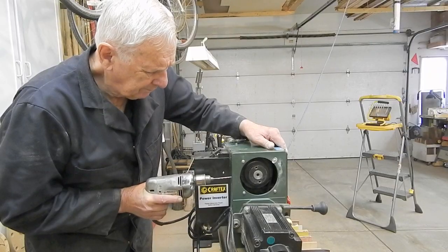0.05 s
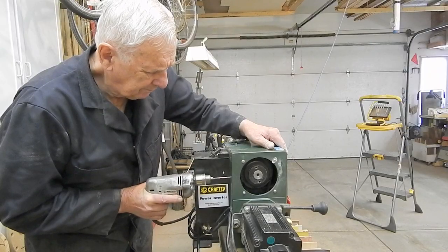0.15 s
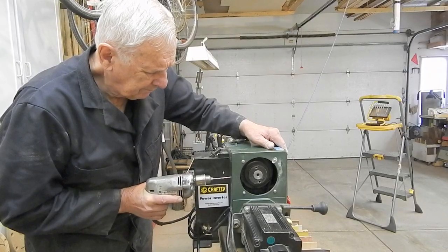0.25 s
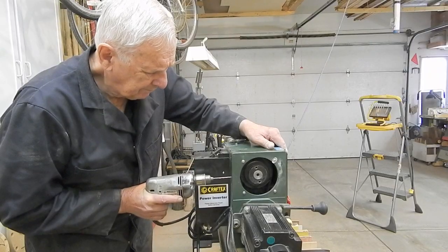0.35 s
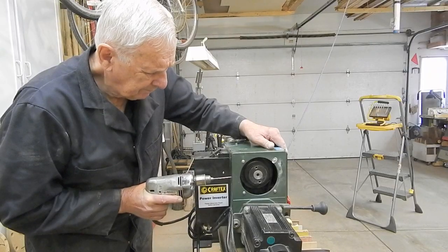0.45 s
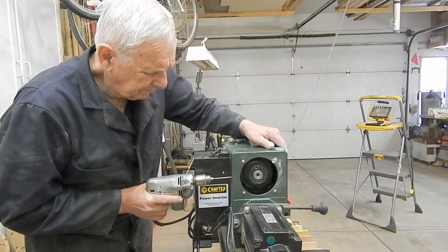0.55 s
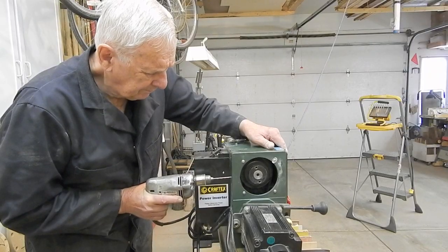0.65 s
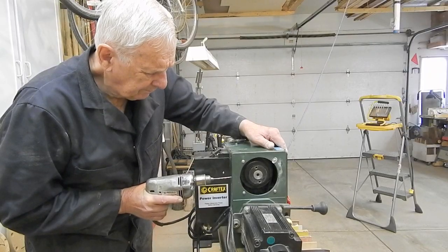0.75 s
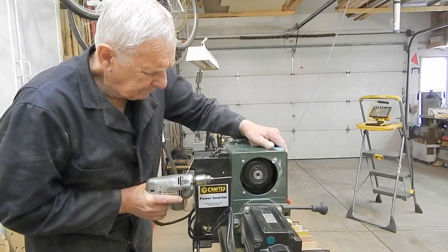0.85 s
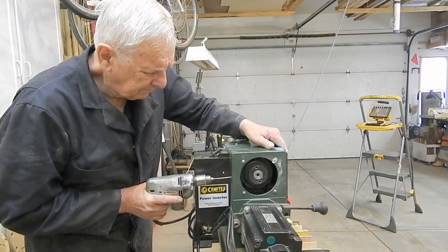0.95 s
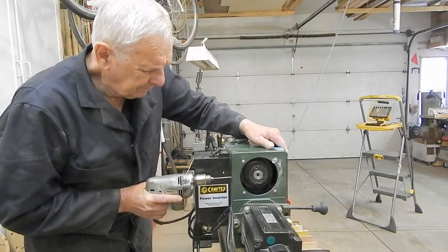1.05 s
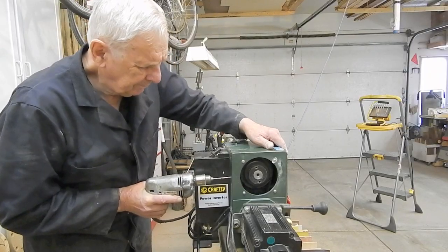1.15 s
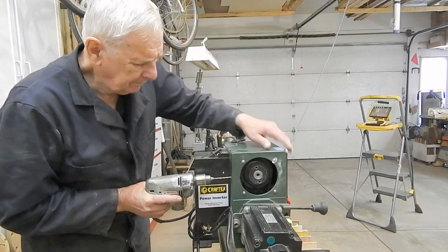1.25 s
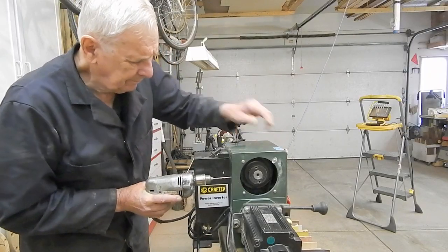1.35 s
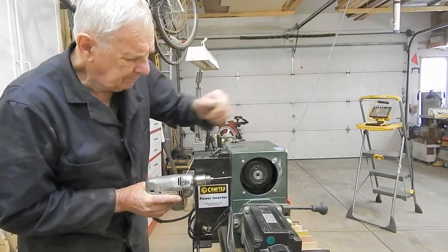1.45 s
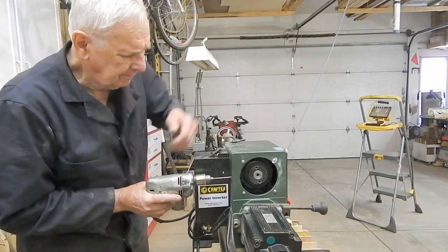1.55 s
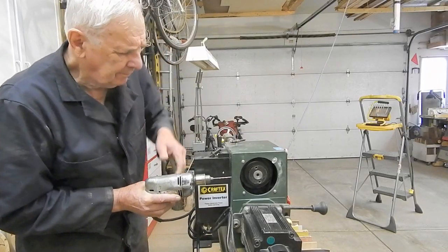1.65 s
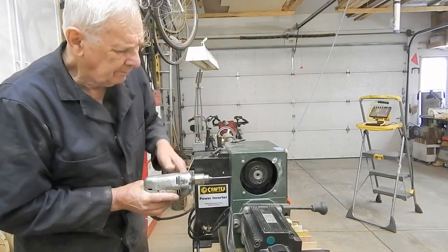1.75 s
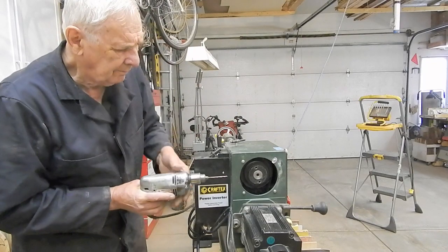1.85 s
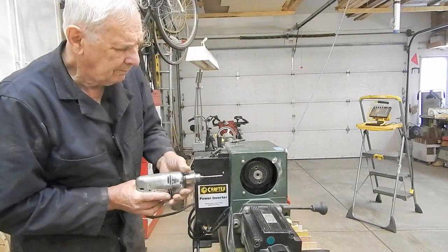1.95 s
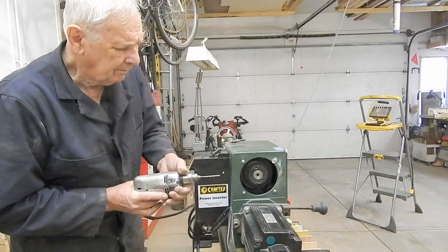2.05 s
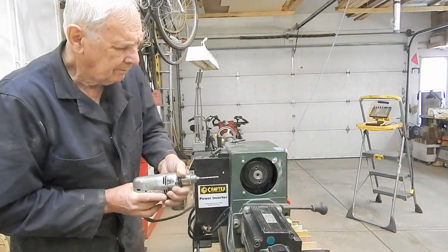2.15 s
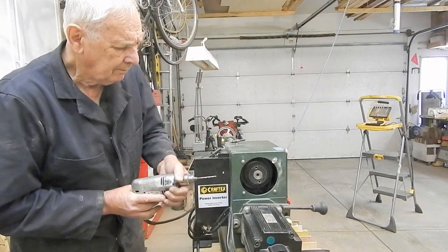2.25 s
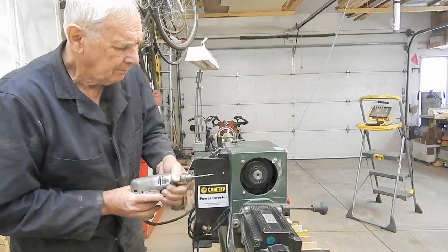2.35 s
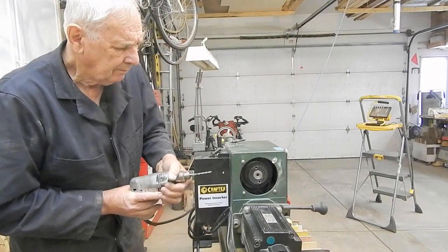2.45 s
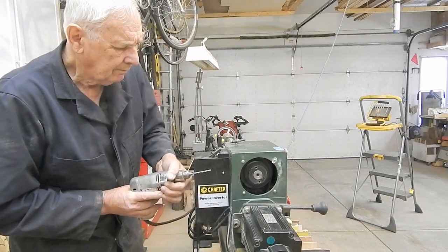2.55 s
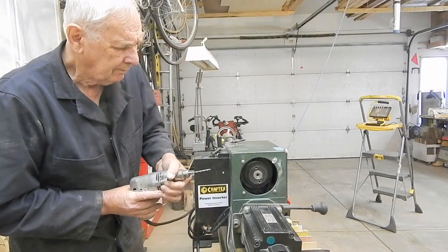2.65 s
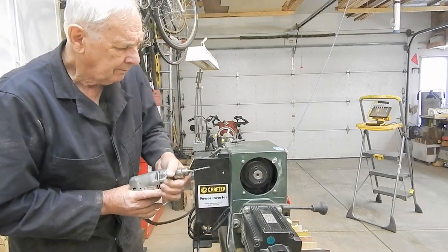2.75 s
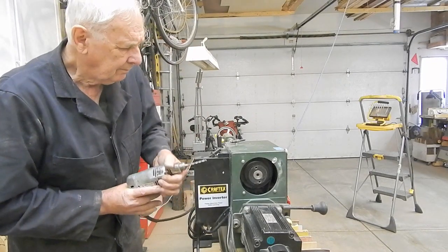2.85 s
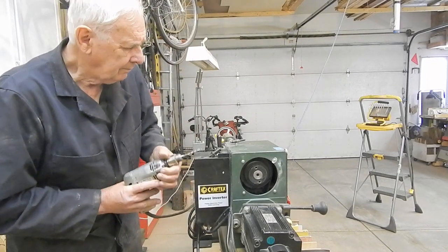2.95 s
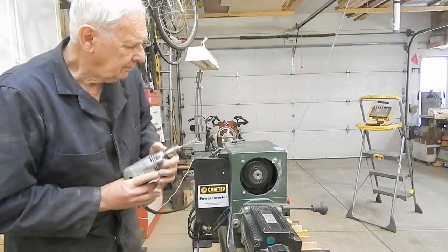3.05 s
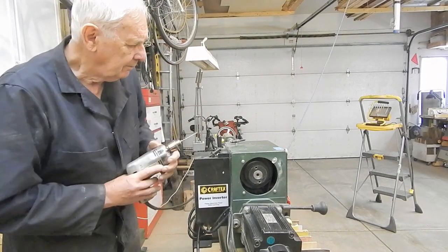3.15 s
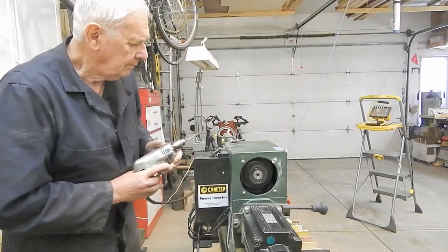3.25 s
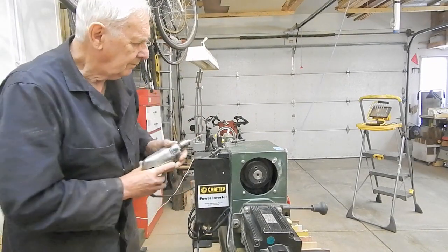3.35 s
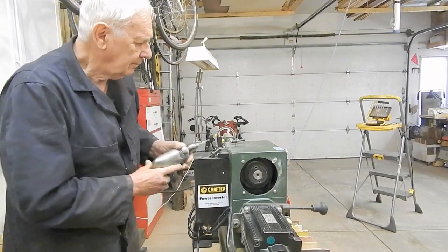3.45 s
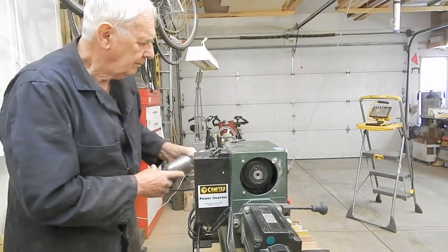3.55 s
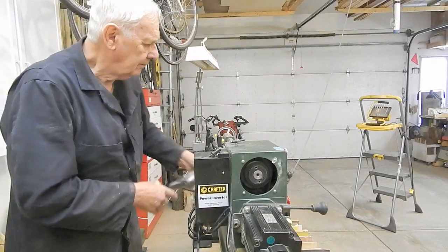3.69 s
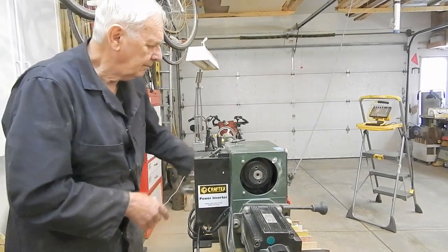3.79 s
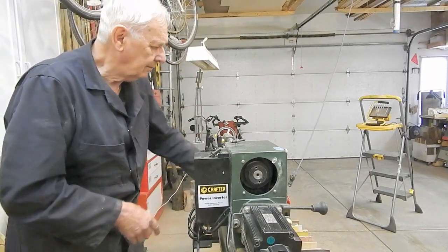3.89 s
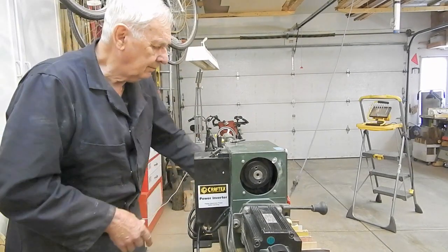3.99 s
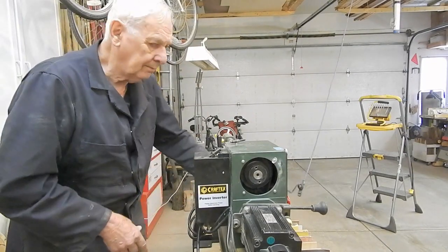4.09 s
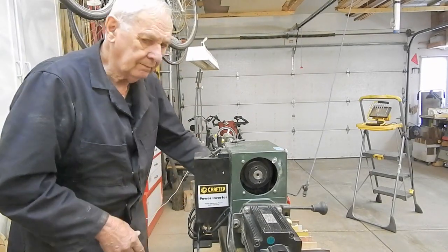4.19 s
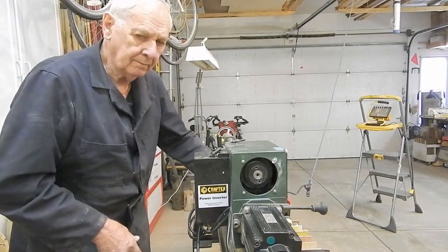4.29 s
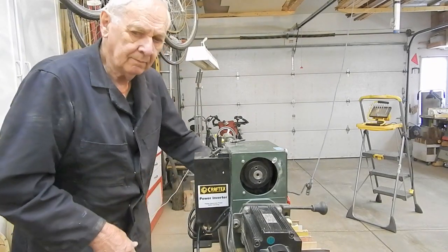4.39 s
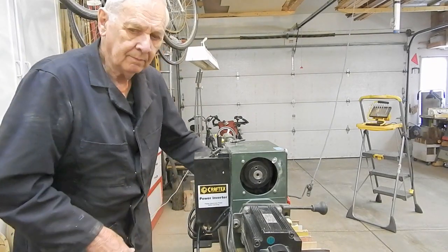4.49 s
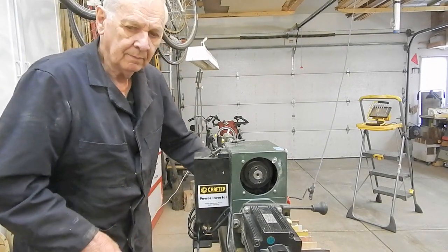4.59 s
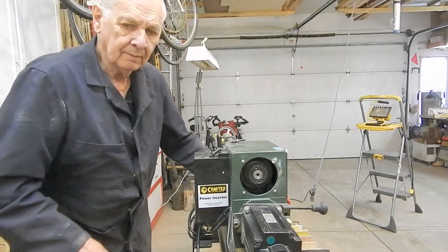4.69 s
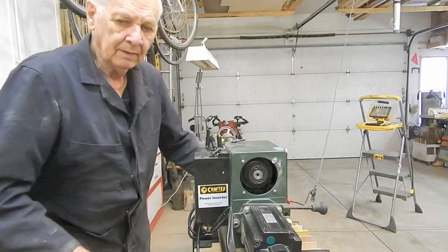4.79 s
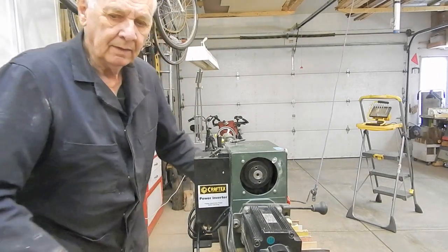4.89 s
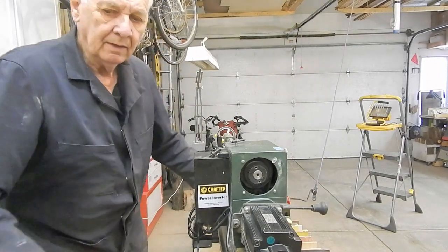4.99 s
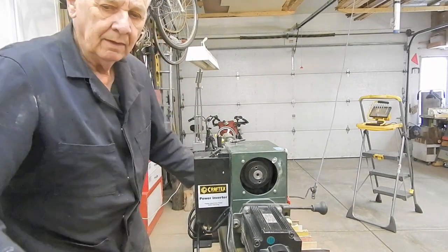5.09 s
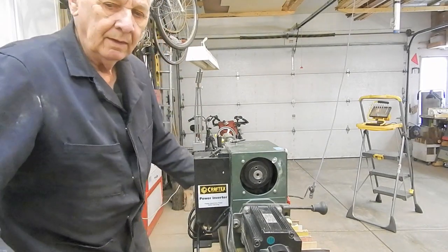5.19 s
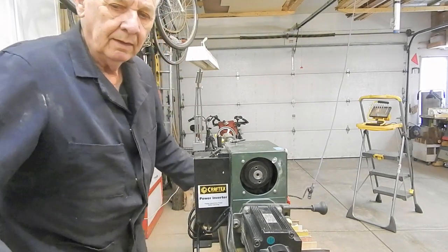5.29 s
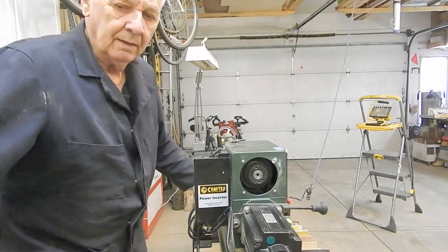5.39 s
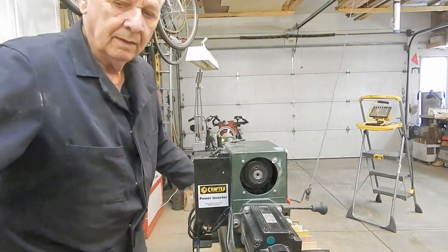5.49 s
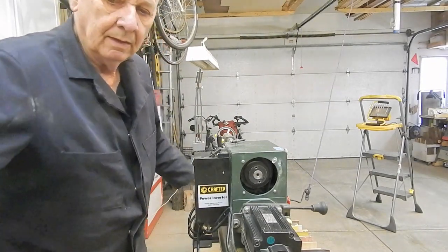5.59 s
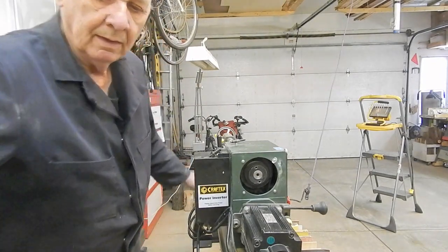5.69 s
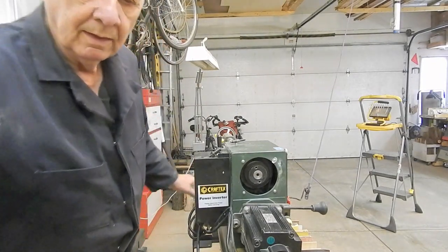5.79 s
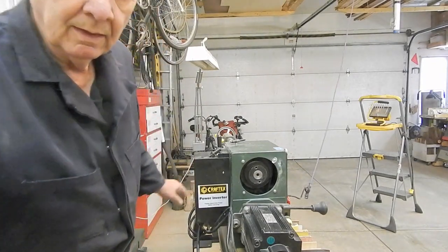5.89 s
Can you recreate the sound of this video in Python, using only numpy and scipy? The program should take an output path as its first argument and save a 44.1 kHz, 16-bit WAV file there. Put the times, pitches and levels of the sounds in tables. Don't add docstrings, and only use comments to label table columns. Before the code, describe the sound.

A corded drill whines steadily, winds down and is braked with a groan, then gets set down on a booming steel cart in a garage.

```python
import sys
import numpy as np
from scipy import signal
from scipy.fft import rfft, irfft
from scipy.io import wavfile
from scipy.ndimage import uniform_filter1d

SR = 44100
rng = np.random.default_rng(int(sys.argv[2]) if len(sys.argv) > 2 else 0)


def convert_level_to_amplitude(level_db):
    exponent = np.asarray(level_db, float) / 20
    return 10 ** exponent


def store_pcm(level_fs):
    pcm = np.round(np.clip(level_fs, -1, 1) * 32767).astype(np.int16)
    wavfile.write(sys.argv[1], SR, np.atleast_2d(pcm).T)


N = 261513
T = np.arange(N) / SR


def evened(x):
    return x / np.sqrt(np.mean(x ** 2) + 1e-20)


def read(points, hz):
    f, value = np.transpose(points)
    return np.interp(np.log(hz + 1), np.log(f + 1), value)


def curve(rows, t, column):
    return np.interp(t, np.array(rows)[:, 0], np.array(rows)[:, column])


def while_on(rows):
    since_start_s = T - rows[0][0]
    to_end_s = rows[-1][0] - T
    return np.clip(np.minimum(since_start_s + .15, to_end_s + .05) / .05, 0, 1)


def wander(hz):
    coarse = rng.standard_normal(4096)
    lowpass = 1 / (1 + (np.fft.rfftfreq(len(coarse), 64 / SR) / hz) ** 2)
    smooth = irfft(rfft(coarse) * lowpass)
    return evened(np.interp(np.arange(N) / 64, np.arange(len(coarse)), smooth))


def resonate(x, hz, width_hz):
    turn = np.exp(2j * np.pi * np.cumsum(hz * np.ones(N)) / SR)
    r = np.exp(-np.pi * width_hz / SR)
    smooth = signal.lfilter([(1 - r) ** 2], [1, -2 * r, r * r], x / turn)
    return 2 * (turn * smooth).real


def related(a, b, same, hz):
    like = np.clip(read(same, hz), -1, 1)
    if a.ndim == 2 and len(a) == len(hz) and a.shape[-1] != len(hz):
        like = like[:, None]
    return np.array([a, like * a + np.sqrt(1 - like ** 2) * b])


def hiss(field_db, same, patchy_db, size=512, side=((1, 0), (2, 0))):
    hz = np.fft.rfftfreq(size, 1 / SR)
    t = np.arange(4 * N // size + 5) * size / 4 / SR
    a, b, c, d, patch = rng.standard_normal((len(t), len(hz), 5)).T
    patch = uniform_filter1d(patch, size=6, axis=0)
    patch = evened(uniform_filter1d(patch, size=10, axis=1))
    z = related(a + 1j * b, c + 1j * d, same, hz)
    z = z * convert_level_to_amplitude(field_db(hz[:, None], t) + patchy_db * patch)
    z = z * convert_level_to_amplitude(np.outer([.5, -.5], read(side, hz)))[..., None]
    return signal.istft(z, nperseg=size, noverlap=3 * size // 4)[1][:, :N]


# (frequency [Hz], t60 [s])
GARAGE_T60 = [(200, 1), (500, 0.59), (1200, 0.62), (3000, 0.76), (7000, 0.52), (12000, 0.27)]


def garage(x):
    taps = np.zeros((2, SR))
    at = np.arange(300, SR - 20, 20) + rng.integers(0, 20, (2, (SR - 301) // 20))
    np.put_along_axis(taps, at, rng.choice([-1., 1.], at.shape), 1)
    taps[1] = .9 * taps[0] + .7 * signal.lfilter([1, -.9], [1, -.3], taps[1])
    hz, t, z = signal.stft(taps, SR, nperseg=256)
    decay_db = -60 * t / read(GARAGE_T60, hz)[:, None]
    tail = signal.istft(z * convert_level_to_amplitude(decay_db), SR, nperseg=256)[1]
    return signal.fftconvolve(x[None], tail / np.linalg.norm(tail[0]), axes=1)[:, :N]


# (time [s], speed [turns/s])
SPEED = [(0, 326), (1.25, 327), (1.55, 274), (1.83, 243), (2.0, 222), (2.2, 195), (2.38, 125), (2.55, 84),
         (2.8, 50)]


def slowing(t):
    return 1 - curve(SPEED, t, 1) / SPEED[0][1]


# (time [s], level [dB])
EFFORT = [(0, -33.5), (0.55, -34), (1.0, -34), (1.06, -36), (1.31, -33.5), (1.45, -36), (1.9, -33.5),
          (2.2, -33.5), (2.27, -32.5), (2.36, -34.5), (2.48, -31), (2.6, -32.5), (2.75, -45), (2.95, -66.5)]
# (frequency [Hz], density [dB/Hz])
RUNNING = [(71, -56.5), (120, -13), (216, -34), (319, -8.5), (360, -16), (519, -17.5), (662, -9),
           (1830, -14.5), (2860, -4), (3660, -6), (7010, -11), (8590, -12.5), (10500, -2.5), (11700, -10.5),
           (15500, -18)]
# (frequency [Hz], density [dB/Hz])
COASTING = [(71, -48), (120, -45), (196, -29), (240, -53), (276, -21), (390, -17), (459, -35), (574, -13.5),
            (1650, -13), (2860, -2.5), (3580, -4), (8080, -13.5), (10500, -9.5), (13700, -14.5),
            (15500, -51)]
# (frequency [Hz], width [Hz], gain [dB])
CASING = [(777, 123, -7), (2014, 76, 11.5), (2324, 40, 8), (2611, 57, 10.5), (2957, 49, 10),
          (6980, 510, 6.5), (3810, 920, -9.5), (6070, 1500, -4), (11700, 220, -6)]
# (frequency [Hz], likeness [-1..1])
DRILL_SAME = [(60, 0.75), (150, -0.32), (380, 0.92), (950, 0.74), (2380, 0.54), (5980, -0.26),
              (15000, -0.24)]
# (frequency [Hz], left minus right [dB])
DRILL_SIDE = [(60, -3), (180, -5.5), (550, -2.0), (1650, -3), (4970, -5), (15000, -2)]


def drill_noise():
    def field_db(hz, t):
        slowed = np.clip(1.7 * slowing(t), 0, 1)
        loss = abs(slowing(t)) ** 3.7
        colour = (1 - slowed) * read(RUNNING, hz) + slowed * read(COASTING, hz)
        colour = colour + sum(db / (1 + (2 * (hz - f) / w) ** 2) for f, w, db in CASING)
        below_hiss = 1 / (1 + (hz / 3900) ** 6)
        body = 1 / (1 + (hz / 1600) ** 6)
        gears = below_hiss - body
        fan = 1 - below_hiss
        lean_db = body * (-6.5 - loss) - 10 * gears + fan * (-6 - 18 * loss)
        return colour + lean_db + curve(EFFORT, t, 1)

    turns = np.cumsum(curve(SPEED, T, 1)) / SR
    throb_db = 0.96 * np.cos(2 * np.pi * turns)
    throb_db += 0.11 * np.cos(2 * np.pi * turns / 12.0)
    throb_db += 0.5 * wander(55) + 0.69 * wander(3.1)
    noise = hiss(field_db, DRILL_SAME, patchy_db=1.5, side=DRILL_SIDE)
    return convert_level_to_amplitude(-29.0) * evened(noise) * convert_level_to_amplitude(throb_db) * while_on(EFFORT)


# (multiple of armature speed, loaded [dB], coasting [dB])
ORDERS = [(1.001, -47, -51), (2, -98, -71), (3.002, -55.5, -60), (4.044, -51.5, -44), (6.98, -53, -60),
          (8.36, -51, -58), (8.925, -47.5, -58), (12, -40, -48), (24.4, -57, -45)]


def drill_tones():
    speed = curve(SPEED, T, 1) * (1 + 0.004 * wander(27.6))
    coasting = np.clip(5 * (1 - speed / SPEED[0][1]), 0, 1)
    out = np.zeros(N)
    for order, load_db, coast_db in ORDERS:
        hz = order * speed
        boost_db = 0.67 * sum(d / (1 + (2 * (hz - f) / (w + 200)) ** 2) for f, w, d in CASING[1:])
        thin_db = -90 * np.clip(1 - hz / np.minimum(2250, 290 * order), 0, 1)
        thin_db -= 11 * np.clip((hz - 3150) / 500, 0, 1)
        waver_db = min(order, 3) * 0.9 * wander(14)
        db = load_db + coasting * (coast_db - load_db) + boost_db + thin_db + waver_db
        out += convert_level_to_amplitude(db) * np.sin(2 * np.pi * (np.cumsum(hz) / SR + rng.random()))
    out *= convert_level_to_amplitude(curve(EFFORT, T, 1) + 28.5) * while_on(EFFORT)
    return out + squeals() + groan()


# (time [s], lower [Hz], upper [Hz])
SQUEAL_HZ = [(0, 10250, 10920), (1.0, 10255, 10920), (1.6, 10270, 10860), (1.85, 10330, 10800),
             (2.3, 10370, 10740), (2.7, 10360, 10720)]
# (width [Hz], level over effort [dB], change when coasting [dB], flutter [dB])
SQUEALS = [(45, -4.5, 0, 1.5), (110, -9.5, -3.5, 1)]


def squeals():
    gripped_s = T - 2.335
    grip_db = 13 * np.exp(-(gripped_s / 0.022) ** 2)
    grip_db += -8 * np.clip(gripped_s / .04, 0, 1)
    grip_db += -35 * np.maximum(gripped_s, 0)
    out = 0
    for column, (width_hz, db, loss_db, flutter_db) in enumerate(SQUEALS, 1):
        grit = rng.standard_normal(N)
        hz = curve(SQUEAL_HZ, T, column)
        core = evened(resonate(grit, hz, width_hz))
        skirt = evened(resonate(grit, hz, 5 * width_hz))
        level_db = db + loss_db * np.clip(5.2 * slowing(T), 0, 1) + flutter_db * wander(22)
        level_db = level_db + grip_db + curve(EFFORT, T, 1)
        out = out + convert_level_to_amplitude(level_db) * evened(core + 0.46 * skirt)
    return out * while_on(EFFORT)


# (frequency [Hz], density [dB/Hz])
TONE = [(12, -40), (20, -2.5), (112, -5.5), (148, -11.5), (207, -6.5), (342, -15.5), (597, -14.5),
        (686, -16.5), (1300, -19), (1770, -26), (6540, -34.5), (10500, -33.5), (15500, -42)]
# (frequency [Hz], likeness [-1..1])
TONE_SAME = [(60, 0.85), (180, 0.72), (550, 0.8), (1650, 0.24), (4970, -0.33), (15000, -0.02)]


def room_tone():
    noise = hiss(lambda hz, t: read(TONE, hz) + 0 * t, TONE_SAME, patchy_db=3.0, size=2048)
    let_up_s, open_time_s, open_db = 2.51, 0.42, -46
    held = np.exp(-np.maximum(T - let_up_s, 0) / open_time_s)
    held_db = -61 + 2 * np.minimum(T, let_up_s)
    return convert_level_to_amplitude(open_db + held * (held_db - open_db)) * evened(noise)


# (time [s], level [dB])
ENGINE = [(.4, -67), (1.0, -61), (1.7, -70), (2.2, -53.5), (2.6, -66), (3.0, -46.5), (3.5, -49.5),
          (4.7, -53), (5.3, -77)]
# (time [s], frequency [Hz])
ENGINE_HZ = [(.4, 91.5), (1.8, 93), (2.5, 94.8), (3.0, 96), (3.4, 96.6), (5.3, 96.3)]
# (multiple of firing rate, level [dB])
ENGINE_ORDERS = [(1, 0), (2, -11), (2.5, -17), (4, -10), (4.5, -17)]


def engine():
    turns = np.cumsum(curve(ENGINE_HZ, T, 1)) / SR
    level_db = curve(ENGINE, T, 1)
    drone = 0
    for order, db in ENGINE_ORDERS:
        tone = np.sin(2 * np.pi * (order * turns + rng.random()))
        drone = drone + convert_level_to_amplitude(db + 1.5 * wander(2.5)) * tone
    third_db = -56.5 + 0.1 * (level_db + 56.5) + 1.5 * wander(2.5)
    third = convert_level_to_amplitude(third_db) * np.sin(2 * np.pi * 3 * turns)
    return np.sqrt(2) * (convert_level_to_amplitude(level_db) * drone + third) * while_on(ENGINE)


# (frequency [Hz], width [Hz], level [dB])
GROAN = [(825, 70, -10.5), (915, 59, -7), (2000, 310, -7)]


def groan():
    grip_s, still_s, slips_hz = 2.474, 2.704, 9.9
    level_db = -44.5 + 2 * np.cos(2 * np.pi * slips_hz * (T - grip_s))
    level_db += 25 * np.minimum((T - grip_s) / .1, 0)
    level_db += -170 * np.maximum(T - still_s, 0)
    out = np.zeros(N)
    for hz, width_hz, db in GROAN:
        out += convert_level_to_amplitude(db) * evened(resonate(rng.standard_normal(N), hz, width_hz))
    return convert_level_to_amplitude(level_db) * out


# (time [s], peak [dB], pitch [Hz])
TICKS = [
    (2.9949, -38, 2020),
    (3.1283, -39.5, 2240),
    (3.252, -37.5, 2090),
]


def chuck():
    t, out = np.arange(1500) / SR, np.zeros(N)
    for (s, db, hz), grit in zip(TICKS, rng.standard_normal((len(TICKS), 400))):
        modes = sum(np.sin(2 * np.pi * k * hz * t) for k in (.5, .6, 1, 1.25))
        modes = modes * convert_level_to_amplitude(-60 * t / .014)
        scrape = grit * convert_level_to_amplitude(-60 * t[:400] / 0.048)
        tick = np.convolve(scrape, modes)[:1500]
        out[round(s * SR):][:1500] += convert_level_to_amplitude(db + 0.5) * tick / abs(tick).max()
    return out


# (crest time [s], sleeve swish [dB], sole scuff [dB], rise [s])
RUSTLE = [(3.12, -61.5, -63, 0.19), (3.25, -69, -62, 0.011), (3.52, -61, -63, 0.26),
          (3.683, -68, -49, 0.029), (3.76, -56.5, -63, 0.074), (3.98, -60, -65, 0.045),
          (4.83, -60.5, -52.5, 0.022), (5.089, -65, -54, 0.095), (5.196, -53.5, -49, .004),
          (5.42, -59, -53, .045), (5.615, -62, -52, .05)]
# (frequency [Hz], density [dB/Hz])
CLOTH = [(4000, -19), (7000, -3), (9500, 4.5), (12500, 6), (15000, -11)]
# (frequency [Hz], density [dB/Hz])
SOLES = [(1000, 6), (2300, 1), (6000, -5.5), (9000, -19.5)]


def rustle():
    s, swish_db, scuff_db, rise_s = np.transpose(RUSTLE)[:, :, None]
    t = T[::32]
    move_db = -19.5 * np.maximum(s - t, 0) / rise_s - 112 * np.maximum(t - s, 0)
    same = [(1000, 0.18), (10000, 0.061)]  # (Hz, likeness)
    out = 0
    for crest_db, colour, db in ((swish_db, CLOTH, 4.2), (scuff_db, SOLES, 3.1)):
        noise = hiss(lambda hz, t: read(colour, hz) + 0 * t, same, patchy_db=3.5, size=256)
        level = convert_level_to_amplitude(crest_db + move_db + db).sum(0)
        out = out + np.interp(T, t, level) * evened(noise)
    return out


# (frequency [Hz], likeness [-1..1])
BLOW_SAME = [(500, 0.88), (1000, 0.84), (2000, 0.5), (5000, 0), (12000, 0.14)]


def ring(contact_s, panels, modes, t60, modes_db):
    count = len(contact_s)
    t = np.arange(10000) / SR
    hz = np.fft.rfftfreq(len(t), 1 / SR)
    a, b = rfft(rng.standard_normal((count, 2, len(t)))).transpose(1, 0, 2)
    dense = irfft(related(a, b, BLOW_SAME, hz) * convert_level_to_amplitude(read(panels, hz)))
    phase = rng.random((count, len(modes), 1))
    clear = 0
    for k, (f, db, decay_s) in enumerate(modes):
        clear = clear + convert_level_to_amplitude(db - 60 * t / decay_s) * np.sin(2 * np.pi * (f * t + phase[:, k]))
    x = evened(dense * convert_level_to_amplitude(-60 * t / t60)) + convert_level_to_amplitude(modes_db) * evened(clear)
    x = x * (1 - np.exp(-t / contact_s))
    return x / np.linalg.norm(x[0], axis=1, keepdims=True)


# (time [s], cart boom [dB], tray clank [dB], rattle [dB], contact [s])
BLOWS = [(3.354, -36, -42.5, -56, 0.016), (3.684, -37.5, -23, -38, .002), (3.751, -50, -29.5, -40, .002),
         (3.858, -60, -47, -53, .0055), (4.005, -34, -12.5, -15, 0.019), (4.066, -22, -9, -14, 0.0074),
         (4.104, -26, -21, -17.5, .0023), (4.138, -5, -11.5, -18, 0.0087), (4.46, -7.5, -9, -30, 0.0024),
         (4.483, -4, -14, -24, 0.0031), (4.658, -40, -50, -60, .007), (4.712, -21.5, -24, -39, 0.0025),
         (4.863, -56, -32, -70, .0046), (4.942, -30, -31, -60, 0.004), (5.024, -51, -35.5, -60, .006),
         (5.085, -36.5, -55, -50, 0.0033), (5.19, -41, -37, -36, .001), (5.259, -38.5, -41, -40, 0.0032),
         (5.605, -45, -35, -34.5, 0.0022)]
# (frequency [Hz], density [dB/Hz])
CART_PANELS = [(76, -49), (130, -12), (199, -11.5), (297, -14), (448, 0.5), (730, -1.5), (850, -13.5),
               (1100, -1), (1640, -18.5), (1940, -20), (5000, -39), (6500, -69), (11000, -120)]
# (frequency [Hz], level [dB], t60 [s])
CART_MODES = [(430, -17, 0.073), (441.7, 5, 0.34), (645, -1.5, 0.13), (1087, 1.5, .1)]
# (frequency [Hz], density [dB/Hz])
TRAY_PANELS = [(290, -42), (500, -17), (661, -18), (914, 3), (991, -18), (1130, 1), (1770, -7),
               (2210, -3.5), (3200, -10.5), (3800, -22.5), (8000, -37), (17600, -120)]
# (frequency [Hz], level [dB], t60 [s])
TRAY_MODES = [(955, 11, 0.063), (1024, -7, 0.14), (1142, -18.5, 0.04), (2330, -12, 0.072), (2840, 1, 0.058)]
# (frequency [Hz], density [dB/Hz])
RATTLE = [(2500, -1), (4500, 0.5), (6000, 0), (8000, -3.5), (10500, -2.5), (13000, -12), (15500, -34)]


def blows():
    s, cart_db, tray_db, rattle_db, contact_s = np.transpose(BLOWS)[:, :, None]
    contact_s = np.clip(contact_s, .0005, .03)
    cart_modes_db = -1.5 + 8.5 * np.log10(contact_s / 0.0041)
    cart = ring(contact_s, CART_PANELS, CART_MODES, t60=0.29, modes_db=cart_modes_db)
    tray = ring(0.35 * contact_s, TRAY_PANELS, TRAY_MODES, t60=0.22, modes_db=-17)
    rattle = ring(0.1 * contact_s, RATTLE, TRAY_MODES, t60=0.23, modes_db=-60)
    knocks = convert_level_to_amplitude(25.5 + cart_db) * cart + convert_level_to_amplitude(20.0 + tray_db) * tray + convert_level_to_amplitude(21.0 + rattle_db) * rattle
    out = np.zeros((2, N + SR))
    for at, sound in zip(s[:, 0], knocks.transpose(1, 0, 2)):
        out[:, round(at * SR):][:, :sound.shape[1]] += sound
    thin_steel = signal.butter(3, 150, "high", fs=SR, output="sos")
    return signal.sosfilt(thin_steel, out[:, :N])


def scene():
    tones, knocks, ticks = drill_tones(), blows(), chuck()
    drill = drill_noise() + convert_level_to_amplitude(6.0) * tones * convert_level_to_amplitude([[-2], [1.5]]) + convert_level_to_amplitude(-2.0) * garage(tones)
    cart = convert_level_to_amplitude(-5.5) * knocks + ticks + convert_level_to_amplitude(-9.5) * garage(knocks.mean(0) + 1.1 * ticks)
    return drill + (cart + rustle() + engine() + room_tone()) * convert_level_to_amplitude([[-1.2], [1.2]])


def low_pass(x):
    return signal.sosfilt(signal.butter(12, 15640, fs=SR, output="sos"), x)


def record(dry):
    return low_pass(dry)


dry = scene()
out = record(dry)
store_pcm(out)
```